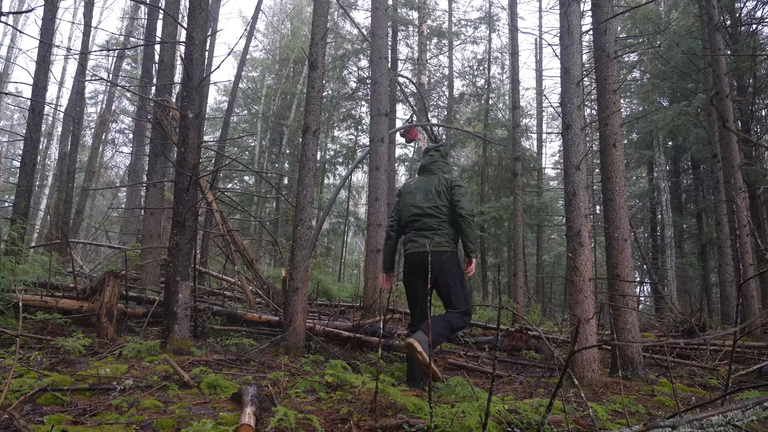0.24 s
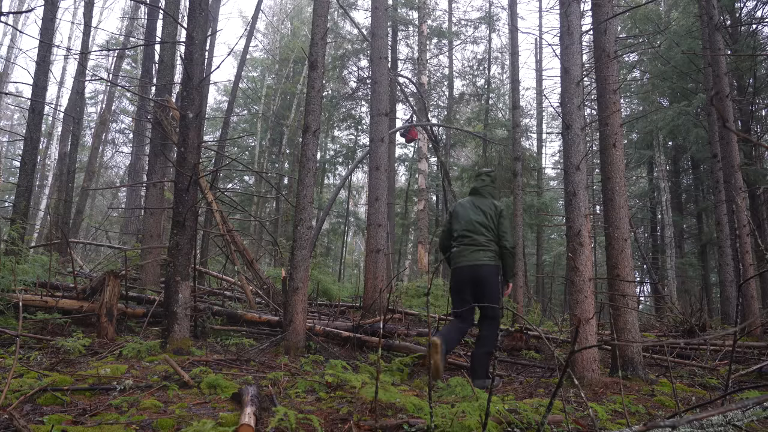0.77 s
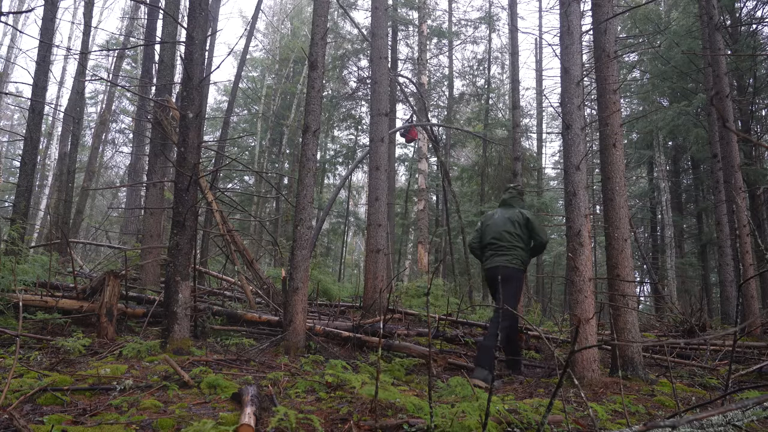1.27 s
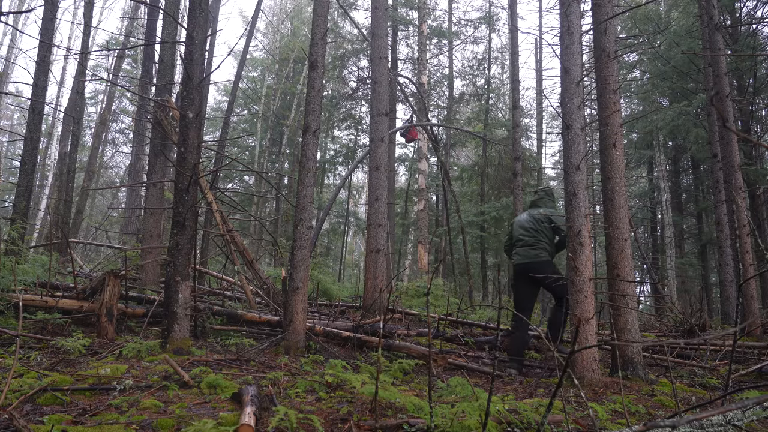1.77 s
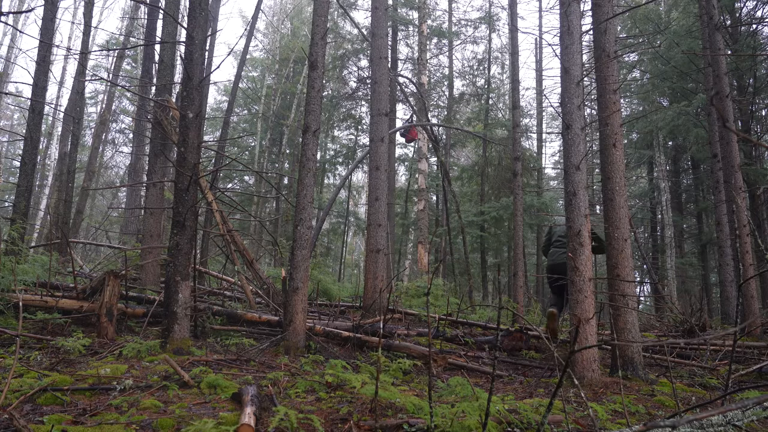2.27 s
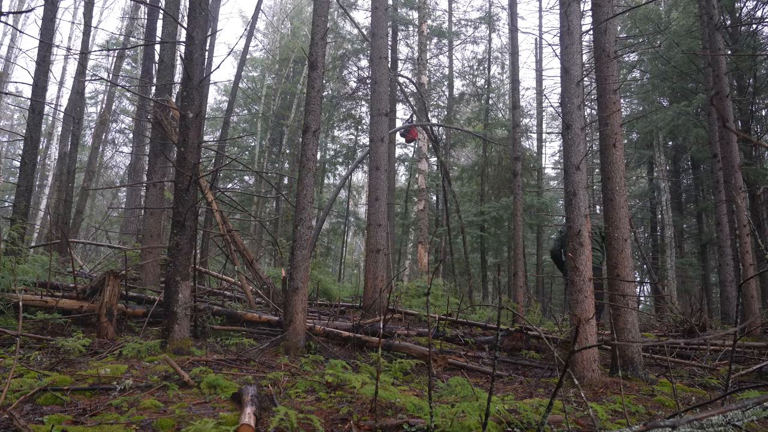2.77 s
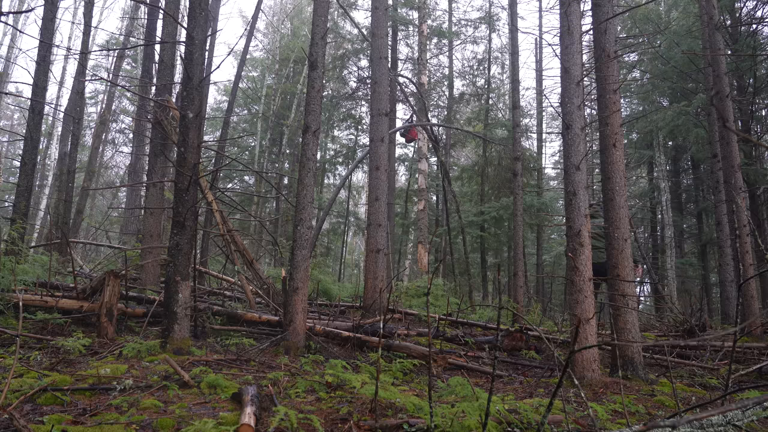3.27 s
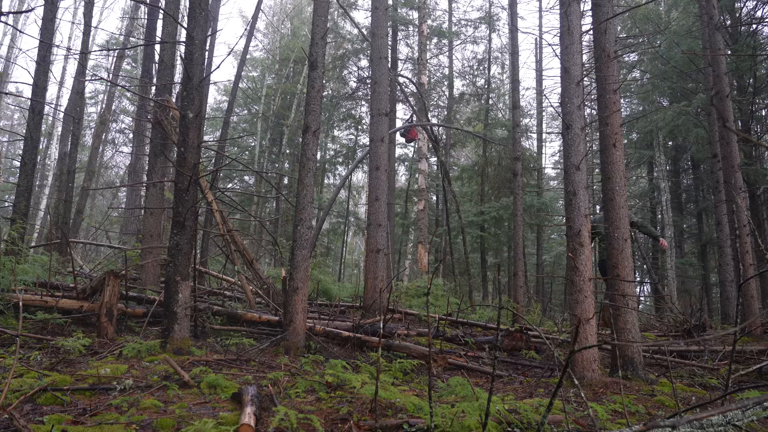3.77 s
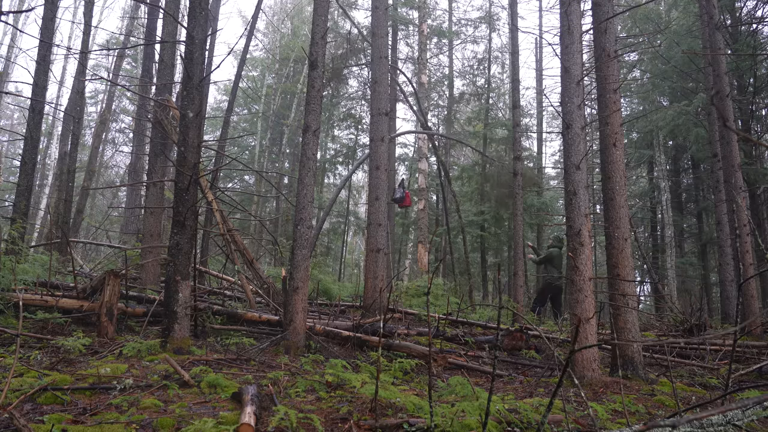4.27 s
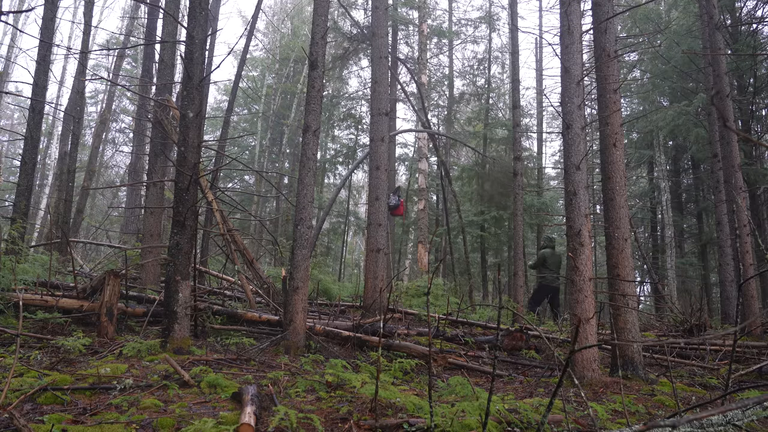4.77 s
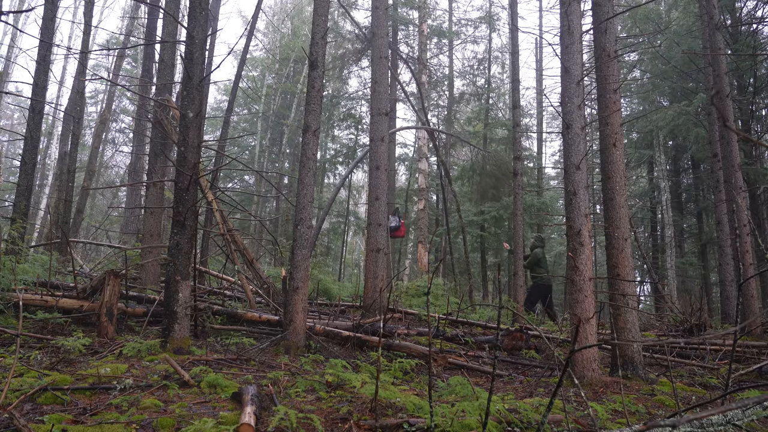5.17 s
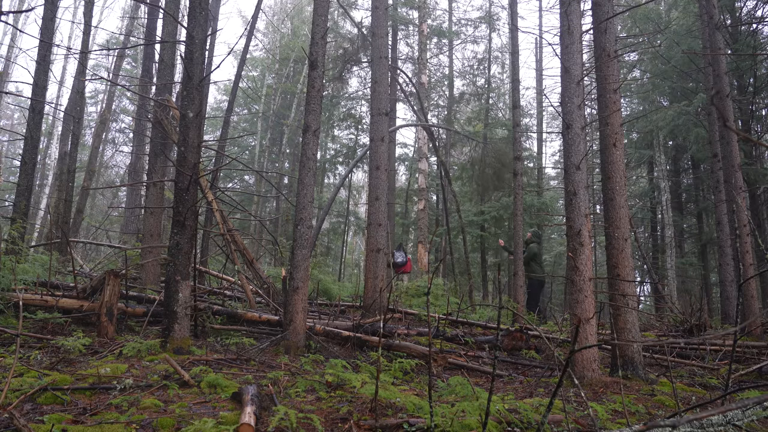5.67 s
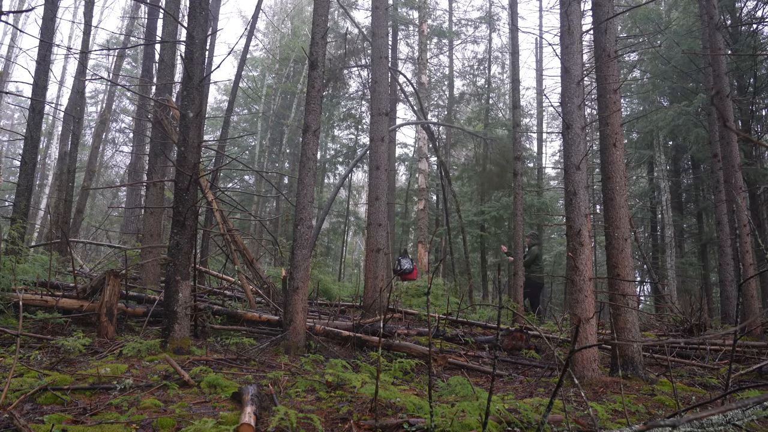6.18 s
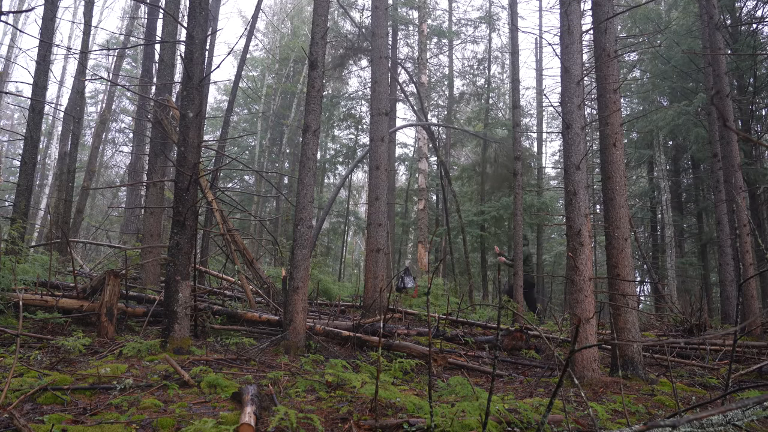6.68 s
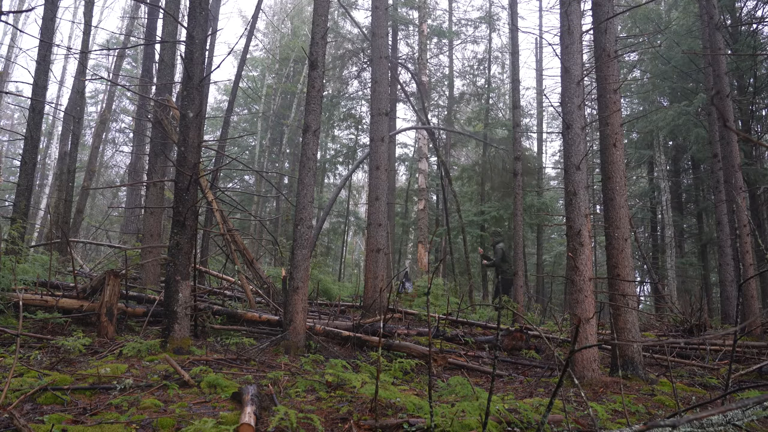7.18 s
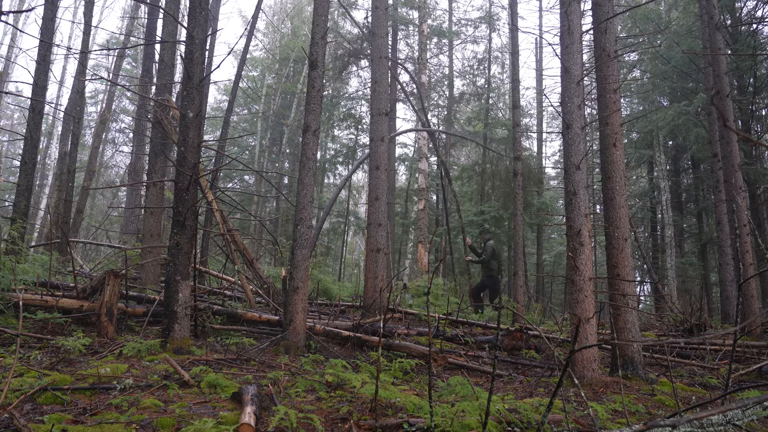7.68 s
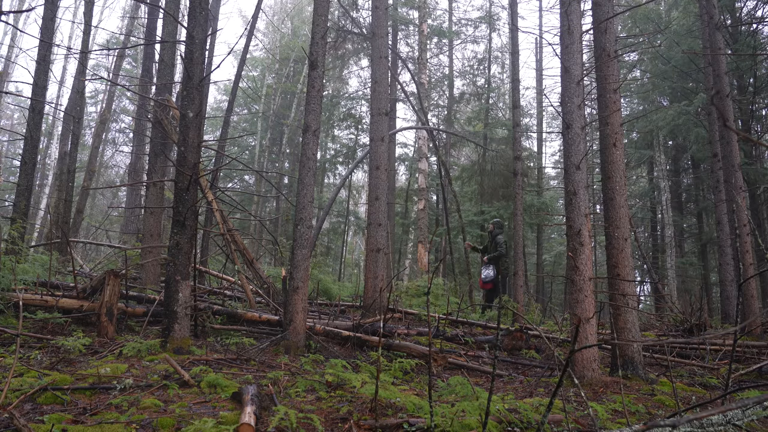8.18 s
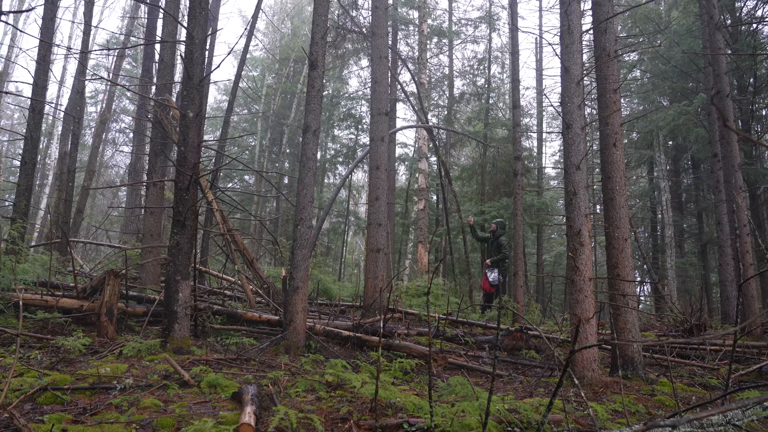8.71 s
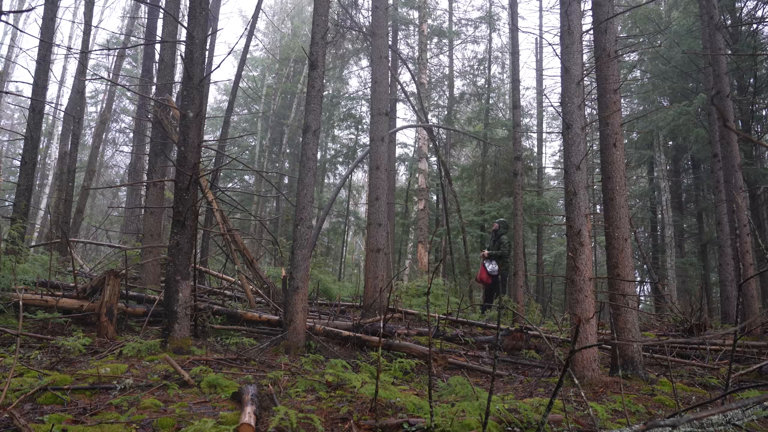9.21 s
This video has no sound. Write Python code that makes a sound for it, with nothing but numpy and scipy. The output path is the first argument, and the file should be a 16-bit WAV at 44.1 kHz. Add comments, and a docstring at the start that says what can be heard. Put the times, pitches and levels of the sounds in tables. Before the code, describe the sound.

Steady rain fills a conifer forest for about nine seconds: a broad soft wash, patter on needles and moss, and crisp, irregular drips close to the microphone. Fat drops thud on the taut tarp above, short hollow notes that sink in pitch. A crackle on wet litter fades within the first second. Dry twigs snap underfoot at 0.6, 1.35 and 2.05 seconds, then a loud crack at 3.1 and smaller ones near 3.4, echoing grainily among the trunks. A heavy thud at 3.75 sets a guy line humming low; a fainter hum came at 1.35. Rain swells around 4.4 as rope rasps unevenly over a branch from 4.1 to 4.7, with two fainter rubs at 5.3 to 5.8. A small bird chips sharply at 5.8, then quickly from 6.1 to 6.4. Drips and tarp thuds continue to the end, with a low gust rumbling near 8.25.

```python
"""Steady rain in a conifer forest: a wash of far drops, patter on needles, a crackle on wet litter that soon
fades, and sharp drips close by: filtered noise, random clicks and very short damped tones.
Fat drops thud on the taut tarp over the microphone as sinking tones; two set a guy line humming.
Someone walks over dead twigs that snap and echo among the trunks, then lets a food bag down on a rope
that rasps over a branch in uneven slips. A small bird chips in fast upward flicks; soft gusts rumble."""
import sys
import numpy as np
from scipy import signal
from scipy.fft import rfft, irfft
from scipy.io import wavfile

SR = 44100
rng = np.random.default_rng(int(sys.argv[2]) if len(sys.argv) > 2 else 0)


def waveform_to_disk(signal):
    """Save audio, clipped to [-1, 1], as 16-bit WAV at the path in sys.argv[1]."""
    frames = np.transpose(np.atleast_2d(signal))
    scaled = np.clip(frames, -1, 1) * 32767
    samples = np.round(scaled).astype(np.int16)
    wavfile.write(sys.argv[1], SR, samples)


N = 416744
TIME = np.arange(N) / SR
TOP_HZ = 15750


def undb(db):
    """Decibels to gain."""
    return 10 ** (np.asarray(db) / 20)


def unit(x):
    """Scale to rms 1."""
    return x / np.sqrt(np.mean(x ** 2))


def blow(x, energy_db):
    """Scale a short sound to a given energy."""
    return x * undb(energy_db) / np.sqrt(np.sum(x ** 2))


def shape_db(points, hz):
    """Read a spectrum on a log-frequency axis."""
    point_hz, point_db = np.transpose(points)
    return np.interp(np.log(hz + 1), np.log(point_hz), point_db)


def colour(x, points, size=4096):
    """Minimum-phase filter with the given spectrum: causal, so attacks stay sharp."""
    bin_hz = np.arange(size // 2 + 1) * SR / size
    cepstrum = irfft(np.log(undb(shape_db(points, bin_hz))))
    # fold the cepstrum onto positive time
    cepstrum[1:size // 2] *= 2
    cepstrum[size // 2 + 1:] = 0
    response = irfft(np.exp(rfft(cepstrum)))
    return signal.fftconvolve(x, response)[:len(x)]


def band(x, lo_hz, hi_hz, order=2):
    """Butterworth band-pass."""
    edges_hz = [lo_hz, min(hi_hz, SR / 2 - 100)]
    sos = signal.butter(order, edges_hz, "band", fs=SR, output="sos")
    return signal.sosfilt(sos, x + 1e-18)


def walk(rate_hz):
    """Slow chance: straight lines between normal random knots, rate_hz knots per second."""
    knots = rng.standard_normal(1024)
    return np.interp(TIME * rate_hz, np.arange(len(knots)), knots)


def swells(table):
    """Rise in dB over time: each swell comes and goes as a bell."""
    return sum(db * np.exp(-((TIME - s) / half_s) ** 2) for s, half_s, db in table)


def scattered(count):
    """Loosely spaced random times, each with three chances between -1 and 1."""
    chance = rng.random((count, 4))
    when_s = (np.arange(count) + chance[:, 0]) / count * TIME[-1]
    return np.column_stack([when_s, 2 * chance[:, 1:] - 1])


def add(out, start_s, x):
    """Mix a short sound in at start_s."""
    i = max(int(start_s * SR), 0)
    out[i:i + len(x)] += x[:N - i]


def impacts(rate_hz, spread_db, cap_db):
    """Random clicks of either sign; many small, few large."""
    falls = rng.random(N) < rate_hz / SR
    size_db = cap_db * np.tanh(spread_db * rng.exponential(size=N) / cap_db)
    return falls * undb(size_db) * rng.choice([-1, 1], N)


def crack(t, decay_s, scatter):
    """A sharp click followed by a dying scatter of tiny ones."""
    x = scatter * rng.standard_normal(len(t)) * np.exp(-t / decay_s)
    x[0] += 1
    return x


def ticks(count=380, spread_db=4.0, cap_db=14, width_octaves=0.95):
    """Single drops a few metres off; each hits its own twig or leaf and has its own colour."""
    out, t = np.zeros(N), TIME[:512]
    octaves = np.log2(np.fft.rfftfreq(len(t), 1 / SR) + 1)
    for when, size, tone in rng.random((count, 3)):
        centre = np.log2(1200) + tone * np.log2(13)
        surface = np.exp(-((octaves - centre) / width_octaves) ** 2)
        click = np.roll(crack(t, decay_s=0.002, scatter=0.2), 64)  # room for the zero-phase filter
        tick = irfft(rfft(click) * surface)
        size_db = cap_db * np.tanh(-spread_db * np.log(1 - size) / cap_db)
        # higher ticks get more energy, for an even spread per Hz
        add(out, when * TIME[-1], blow(tick, size_db) * 2 ** (centre / 2))
    return out


# rain spectrum: freq_hz, relative_db
RAIN_SPECTRUM = [(120, -21.5), (200, -6.5), (334, -2.5), (538, 0.5), (735, -1.5), (1710, -2), (8420, -7),
                 (10700, -12.5), (13800, -11.5), (15100, -16), (16000, -13)]
# showers shed by the crowns: peak_s, half_length_s, rise_db
CROWN_SHOWERS = [(0.17, 0.24, 0.5), (0.68, 0.6, 1.5), (2.12, .22, 3.2), (4.42, 0.3, 5)]
# steady rain levels; dB of spray per dB of a shower
PATTER_DB, SPRAY_DB, SPRAY_FOLLOWS = -47, -49.5, 0.66


def rain(wash_db=0.5, patter_db=-4.0, spray_db=-8.0, tick_db=-6.5, flicker_db=1.56):
    """Far drops merge into a wash; nearer ones patter on twigs, moss and needles, each in its own range."""
    wash = 0
    for lo_hz in 125 * 2. ** np.arange(7):
        octave = band(rng.standard_normal(N), lo_hz, 2 * lo_hz, order=4)
        wash = wash + octave * undb(flicker_db * walk(22))
    patter = 0
    for hz in np.geomspace(700, 11000, num=9):
        patter = patter + band(impacts(rate_hz=70, spread_db=10.5, cap_db=27), hz / 1.4, hz * 1.4)
    spray = band(impacts(rate_hz=120, spread_db=4.0, cap_db=33.5), 980, 13000, order=1)
    drops = undb(wash_db) * unit(wash) + undb(patter_db) * unit(patter)
    drops = drops + undb(spray_db) * unit(spray) + undb(tick_db) * unit(ticks())
    drops = colour(drops, RAIN_SPECTRUM)
    # a shower lifts the heavy patter more than the fine spray
    shower_db = swells(CROWN_SHOWERS)
    low = signal.sosfiltfilt(signal.butter(2, 4500, fs=SR, output="sos"), drops)
    low_gain = undb(PATTER_DB + shower_db) / np.std(band(drops, 700, 4000))
    high_gain = undb(SPRAY_DB + SPRAY_FOLLOWS * shower_db) / np.std(band(drops, 5000, 15000))
    return low * low_gain + (drops - low) * high_gain


def crackle(level_db=-44.0, fade_s=0.44, lo_hz=600, hi_hz=2000):
    """A brief flurry of drops crackles on the wet litter and dies away."""
    grains = band(impacts(rate_hz=260, spread_db=9, cap_db=3), lo_hz, hi_hz)
    return unit(grains) * undb(level_db) * np.exp(-(TIME / fade_s) ** 2)


# air rumble spectrum: freq_hz, relative_db
AIR_SPECTRUM = [(8, -28), (22, 1.5), (40, -4.5), (62, -11.5), (100, -19.5), (160, -21.5), (260, -37),
                (600, -53)]
# gusts: peak_s, half_length_s, rise_db
AIR_GUSTS = [(0.1, 0.18, 3.5), (1.42, 0.12, 5), (8.25, 0.19, 7)]


def air(calm_db=-45, buffet_db=5.0, wander_db=1.1):
    """Slow air buffets the microphone and rises in a few gusts."""
    buffets = undb(buffet_db * walk(13) + wander_db * walk(2))
    rumble = colour(rng.standard_normal(N), AIR_SPECTRUM, size=16384)
    return unit(rumble * buffets) * undb(calm_db + swells(AIR_GUSTS))


def taps(tap_db=-62, sag_db=-54):
    """Lighter drops tap the tarp at random; lower random knocks flap its slack parts."""
    tap = band(impacts(rate_hz=18, spread_db=6, cap_db=12), 110, 300)
    sag = band(impacts(rate_hz=9, spread_db=9, cap_db=15.5), 30.0, 95)
    return undb(tap_db) * unit(tap) + undb(sag_db) * unit(sag)


# loudest near drips: start_s, impact_energy_db, impact_pitch_hz, splash_energy_db
LOUD_DRIPS = [(0.0223, -6.5, 940, -28), (0.066, -6.5, 835, -35), (0.1232, -8, 2110, -36),
              (0.1744, -7, 1230, -27), (0.3359, -7, 1940, -34), (0.5347, -12.5, 1270, -26),
              (0.5968, -14, 1960, -9.5), (0.7372, -9, 1770, -14.5), (1.114, -2.5, 2400, -3.5),
              (1.335, -9, 1730, -9.5), (1.6926, -12, 1860, -30), (1.8436, -28, 3950, -13.5),
              (1.8624, -5.5, 1700, -35), (2.1108, -11, 860, -11), (2.7219, -10, 2190, -24),
              (3.7493, -13, 2310, -18), (3.7643, -32, 1430, -6), (4.0239, -3.5, 1140, -10.5),
              (4.172, -9, 2200, -15), (4.25, -8.5, 1940, -16), (4.332, -4.5, 1820, -9.5),
              (4.7055, -13.5, 1890, -16), (5.0048, -3.5, 1930, -24), (5.1445, -21, 2190, -13.5),
              (5.1905, -11.5, 2900, -41), (5.2459, -7.5, 1830, -14), (6.3157, -1.5, 1740, -25),
              (6.3802, -14, 2400, -35), (6.8669, -16, 2560, -15), (6.8813, -15.5, 2100, -21),
              (7.0742, -18, 2050, -11.5), (7.2286, -23, 3020, -8.5), (7.6, -15.5, 1700, -12.5),
              (8.434, -25, 1820, -16), (8.6019, -32, 3590, -8.5), (8.6267, -4.5, 860, -11),
              (8.985, -7, 2600, -13), (9.1525, -27, 1215, -9.5)]
# splash spectrum: freq_hz, relative_db
SPLASH_SPECTRUM = [(2000, 4), (4500, 7), (6000, 7.5), (8500, 9), (10500, 4.5), (14000, -4.5), (16000, -25)]
# lesser random drips: mid energies, +- scatter, mid pitch, +- octaves
SMALL_IMPACT_DB, SMALL_SPLASH_DB, SMALL_SCATTER_DB = -20.5, -19, 4
SMALL_HZ, SMALL_OCTAVES = 2320, 0.63


def drips(bounce=0.36, decay_cycles=0.21, lowest_hz=290):
    """A near drip slaps for less than a cycle, then splashes; the ground mirrors the slap a moment later."""
    out, t = np.zeros(N), TIME[:1024]
    small = []
    for s, weight, tone, wet in scattered(count=34):
        impact_db = SMALL_IMPACT_DB + SMALL_SCATTER_DB * weight
        splash_db = SMALL_SPLASH_DB + SMALL_SCATTER_DB * wet
        small.append((s, impact_db, SMALL_HZ * 2 ** (SMALL_OCTAVES * tone), splash_db))
    for s, impact_db, hz, splash_db in LOUD_DRIPS + small:
        path = crack(t, decay_s=0.003, scatter=0.053)
        path[rng.integers(5, 30)] += bounce
        slap = np.cos(2 * np.pi * hz * t) * np.exp(-t * hz / decay_cycles)
        slap = band(np.convolve(slap, path)[:len(t)], hz / 6, hz * 1.66, order=1)
        add(out, s, blow(band(slap, lowest_hz, TOP_HZ), impact_db))
        splash = crack(t, decay_s=0.0011, scatter=0.13)
        add(out, s, blow(colour(splash, SPLASH_SPECTRUM), splash_db))
    return out


def forest(x, low_t60_s=0.38, high_t60_s=0.4, high_db=0.0, build_s=0.002, grain_db=6.5, high_hz=5800,
           near_s=0.006):
    """Trunks scatter the sound into a grainy tail of separate small echoes."""
    t = TIME[:SR // 2]
    grain = undb(grain_db * np.clip(rng.standard_normal(len(t)), -3, 3))
    echoes = rng.standard_normal((2, len(t))) * grain
    echoes = echoes * (1 - np.exp(-t / build_s)) * undb(2.5 * walk(300)[:len(t)])
    low = band(echoes[0], 370, 16000) * np.exp(-np.log(1000) * t / low_t60_s)
    high = band(echoes[1], high_hz, 22000) * np.exp(-np.log(1000) * t / high_t60_s)
    nearby = 1 + 1.2 * np.exp(-t / near_s)  # the closest trunks answer loudest
    tail = blow(nearby * (low + undb(high_db) * high), 0)
    return signal.fftconvolve(x, tail)[:N]


# fat drops on the tarp: start_s, energy_db, nominal_pitch_hz, decay_cycles
FAT_DROPS = [(0.1075, -6.5, 182, 1.2), (0.282, 1, 172, 1.8), (1.2977, -7, 182, 0.7), (1.347, -8, 173, 1.3),
             (1.6474, -13.5, 267, 1.3), (1.9017, -7.5, 179, 2.1), (2.1114, -5.5, 289, 0.31),
             (2.374, -5, 163, 0.66), (2.555, -10, 94, .8), (2.852, -5, 181, 0.59), (2.9514, -7, 226, 1.2),
             (3.35, -0.5, 122, 2.2), (3.41, 2, 162, 0.94), (3.752, 7, 94, 0.45), (4.303, -6, 233, 0.52),
             (4.592, 3.5, 130, 0.41), (6.215, -12.5, 229, 1.2), (6.527, -6.5, 216, 0.51),
             (6.9404, -4.5, 165, 0.94), (7.457, -8, 175, 1.3), (8.0509, 2.5, 161, 1.05),
             (8.4903, -6, 188, 0.96), (8.781, -7, 253, 0.79), (9.153, 0, 161, 1.4)]
# lesser random thuds: mid energy, +- scatter, mid pitch, +- octaves
SOFT_THUD_DB, SOFT_SCATTER_DB, SOFT_HZ, SOFT_OCTAVES = -16.5, 3, 200, 0.5


def thuds(stretch=1.14, relax_s=0.0012, settle=0.851, flap_db=-12, flap_s=0.016):
    """A fat drop stretches the tarp: the note starts high and sinks as the sheet relaxes and flaps."""
    out, t = np.zeros(N), TIME[:4096]
    soft = []
    for s, weight, tone, taut in scattered(count=11):
        energy_db = SOFT_THUD_DB + SOFT_SCATTER_DB * weight
        soft.append((s, energy_db, SOFT_HZ * 2 ** (SOFT_OCTAVES * tone), 2 ** taut))
    for s, energy_db, hz, decay_cycles in FAT_DROPS + soft:
        pitch_hz = hz * (settle + stretch * np.exp(-t / relax_s))
        ring = np.sin(2 * np.pi * np.cumsum(pitch_hz) / SR) * np.exp(-t * hz / decay_cycles)
        flap = band(rng.standard_normal(len(t)) * np.exp(-t / flap_s), hz / 3, hz * 1.45)
        add(out, s, blow(ring, energy_db) * rng.choice([-1, 1]) + blow(flap, energy_db + flap_db))
    return out


# twigs breaking: start_s, wood_energy_db, splinter_energy_db, ring_energy_db, lowest_hz (higher: thin twig)
TWIG_BREAKS = [(0.6196, -10, -6, -18, 600), (0.656, -32, -10.5, -35, 1200), (1.3466, -13, -9.5, -25, 600),
               (1.3705, -13, -7, -20, 600), (2.0574, -14, -10, -9.5, 500), (2.063, -30, -0.5, -25, 1200),
               (3.1191, 4.5, 6, 3.5, 480), (3.358, -11, -8.5, -23, 400), (3.3685, -3, 4, -26, 1420),
               (3.372, -9, -10, -32, 1400)]
# dead wood spectrum: freq_hz, relative_db
WOOD_SPECTRUM = [(150, -9), (430, 12), (700, 14), (1200, 14), (1900, 9.5), (3000, 9), (4200, 7.5),
                 (7000, -7)]
# splinter spectrum: freq_hz, relative_db
SPLINTER_SPECTRUM = [(2000, 2), (4200, -1), (6000, 5.5), (8200, 6.5), (11000, -2), (14000, -2),
                     (16000, -12)]
# ring modes of a dry stick: freq_hz, relative_db, t60_s
STICK_MODES = [(654, 12.5, 0.095), (1100, 5, 0.02), (1600, 5, .02), (1790, 22.5, 0.015), (2370, 14, .02)]


def snaps():
    """A twig gives way at once, its fibres tear for a few milliseconds more, and the broken stick rings."""
    out, t = np.zeros(N), TIME[:2048]
    ring = 0
    for hz, db, t60_s in STICK_MODES:
        ring = ring + undb(db) * np.sin(2 * np.pi * hz * t) * np.exp(-np.log(1000) * t / t60_s)
    for s, wood_db, splinter_db, ring_db, lowest_hz in TWIG_BREAKS:
        wood = colour(crack(t, decay_s=0.0042, scatter=0.22), WOOD_SPECTRUM)
        add(out, s, blow(band(wood, lowest_hz, TOP_HZ), wood_db))
        splinters = colour(crack(t, decay_s=0.0026, scatter=0.15), SPLINTER_SPECTRUM)
        add(out, s, blow(splinters, splinter_db))
        add(out, s, blow(ring, ring_db))
    return out


# heavy thuds that set a taut guy line ringing: start_s, level_db
LINE_TWANGS = [(1.347, -38.5), (3.759, -34)]


def hum(hz=61, decay_s=0.26):
    """The guy line hums on at its low note, dying exponentially."""
    start_s, level_db = np.array(LINE_TWANGS).T
    t = np.maximum(TIME - start_s[:, None], 0)
    return undb(level_db) @ (np.sin(2 * np.pi * hz * t) * np.exp(-t / decay_s))


# branch spectrum: freq_hz, relative_db
BRANCH_SPECTRUM = [(70, -14), (150, -3), (260, -2), (380, 1), (560, -6), (800, -15), (1600, -41)]
# rope paid out over the branch: start_s, length_s, full_speed_level_db
ROPE_PULLS = [(4.098, 0.64, -39.5), (5.296, .16, -44.5), (5.534, 0.29, -44.5)]
# share of a pull spent speeding up; loudness = speed ** ROPE_LAW
ROPE_RISE, ROPE_LAW = 0.64, 0.9


def rope(slip_hz=170, jitter=0.4, uneven_db=6.0, rub=0.58):
    """Rope sticks and slips unevenly, each slip knocking the branch; pulls speed up, then the hand brakes."""
    chance = rng.standard_normal((4096, 2))
    at = (np.cumsum(np.exp(jitter * chance[:, 0])) / slip_hz * SR).astype(int)
    slips = np.zeros(N)
    slips[at[at < N]] = undb(uneven_db * chance[at < N, 1])
    rasp = colour(unit(slips - slips.mean()) + rub * rng.standard_normal(N), BRANCH_SPECTRUM)
    loudness = 0
    for s, length_s, level_db in ROPE_PULLS:
        speed = np.interp((TIME - s) / length_s, [0, ROPE_RISE, 1], [0, 1, 0])
        loudness = loudness + undb(level_db) * speed ** ROPE_LAW
    return unit(rasp) * loudness


# bird chips: start_s, first_flick_level_db, centre_hz
BIRD_CHIPS = [(5.771, -24, 3830), (6.132, -29.5, 3330), (6.187, -37, 3540), (6.241, -35.5, 3400),
              (6.289, -36, 3320), (6.339, -32, 3800), (6.408, -35, 3470)]
FLICK_S, FLICK_GAP_S, FLICK_OCTAVES, FLICK_STEP_DB = 0.0074, 0.011, 0.7, -7  # gap: start to start


def bird(count=3):
    """Each chip is a few very short upward flicks, each weaker than the last."""
    out, n = np.zeros(N), int(FLICK_S * SR)
    sweep = 2 ** (FLICK_OCTAVES * np.linspace(-0.5, 0.5, n))
    for s, level_db, hz in BIRD_CHIPS:
        flick = np.hanning(n) * np.sin(2 * np.pi * np.cumsum(hz * sweep) / SR)
        for k in range(count):
            add(out, s + k * FLICK_GAP_S, undb(level_db + k * FLICK_STEP_DB) * flick)
    return out


def scene(drip_echo_db=-16.5, twig_echo_db=-10.5, bird_echo_db=-9, count=3):
    """Near drips echo faintly, bird and twigs more; tarp stays dry; twig echoes use fresh random cracks."""
    near, chips = drips(), bird()
    echo = forest(undb(drip_echo_db) * near + undb(bird_echo_db) * chips)
    twig_echo = sum(forest(snaps()) for _ in range(count))
    twigs = snaps() + undb(twig_echo_db) * twig_echo
    tarp = thuds() + taps() + hum()
    return (rain() + crackle() + air() + near + echo + tarp + twigs + rope() + chips)[None]


def record(dry):
    """The recorder rounds the loudest peaks and cuts the top."""
    low_pass = signal.ellip(10, 0.2, 70, TOP_HZ, fs=SR, output="sos")
    return signal.sosfilt(low_pass, np.tanh(dry))


dry = scene()
out = record(dry)
waveform_to_disk(out)
```